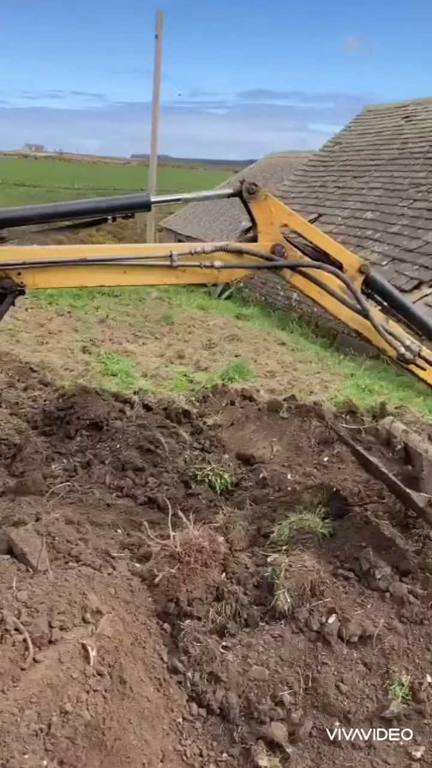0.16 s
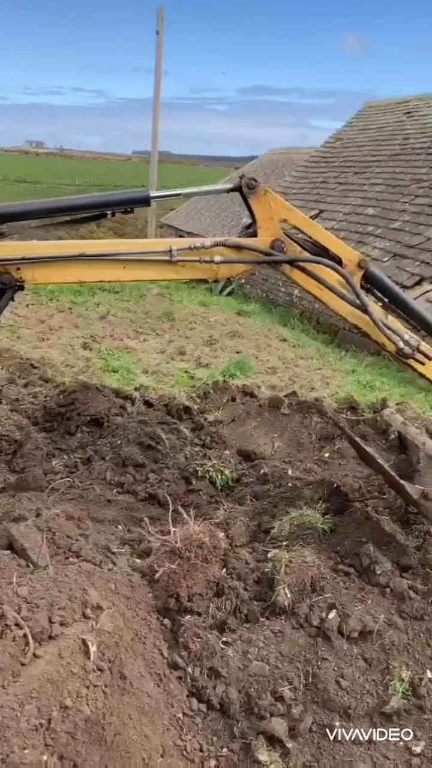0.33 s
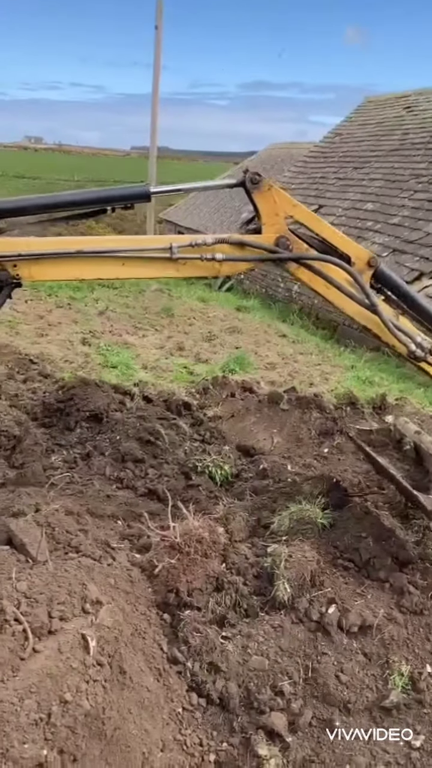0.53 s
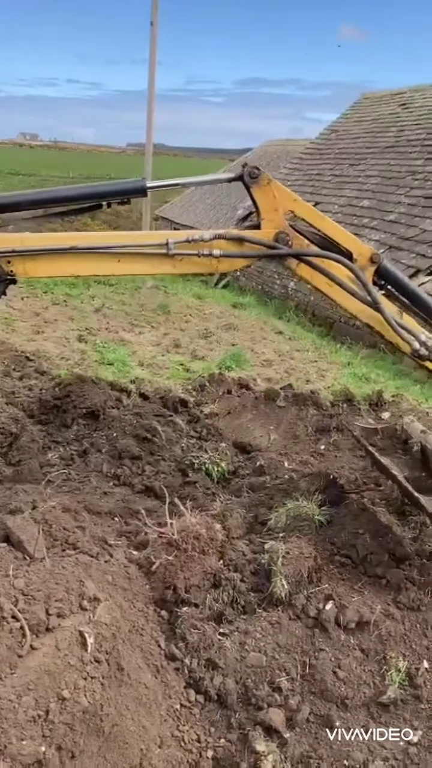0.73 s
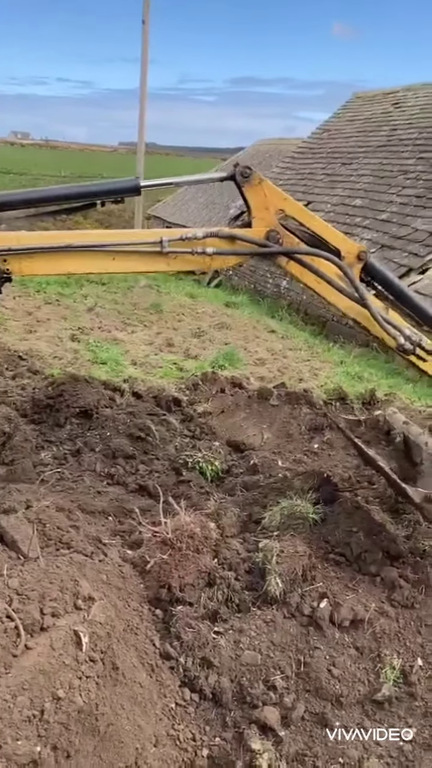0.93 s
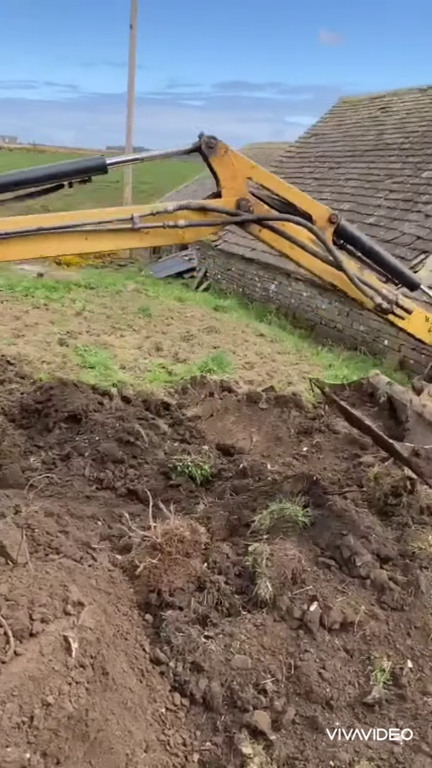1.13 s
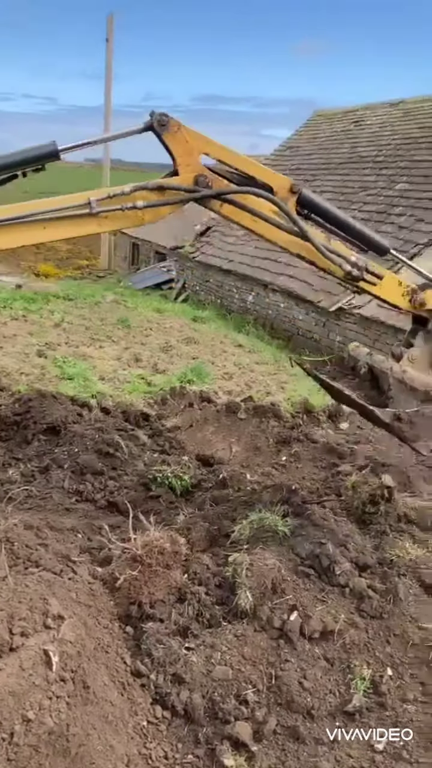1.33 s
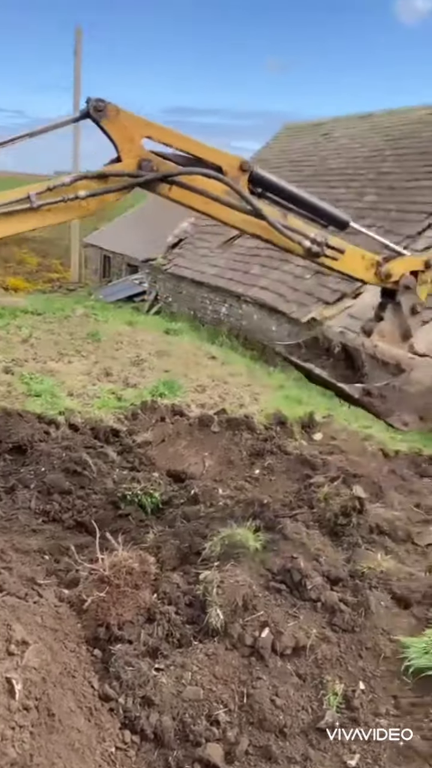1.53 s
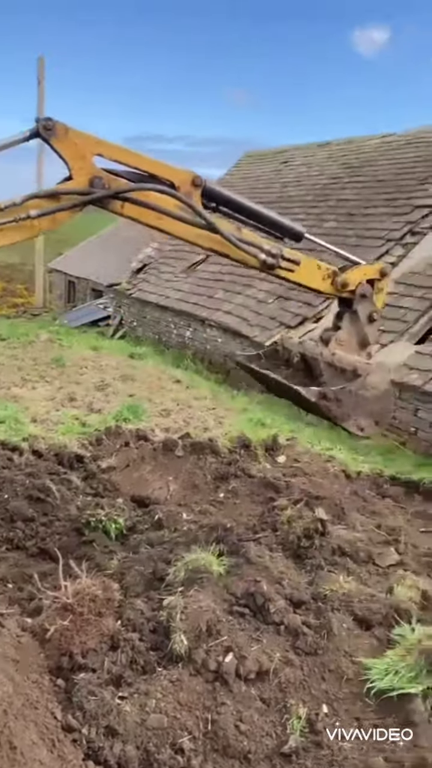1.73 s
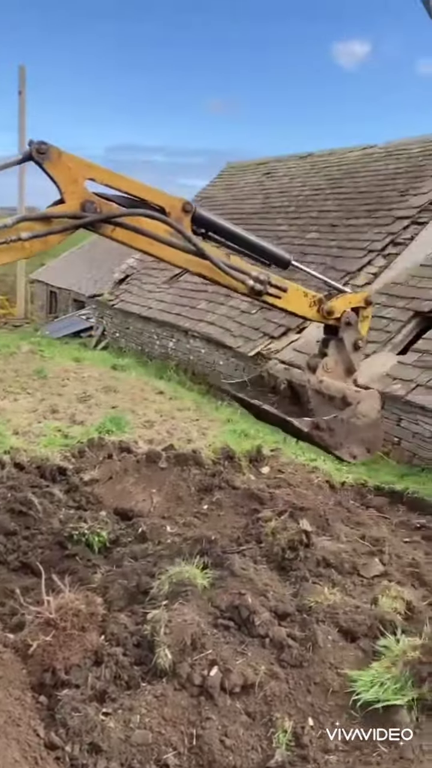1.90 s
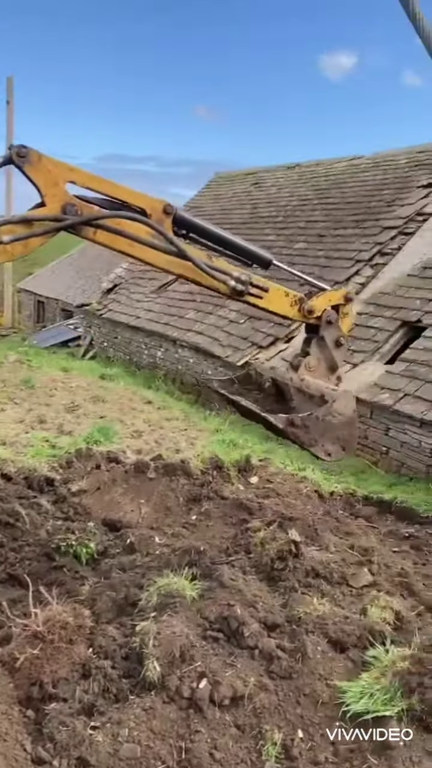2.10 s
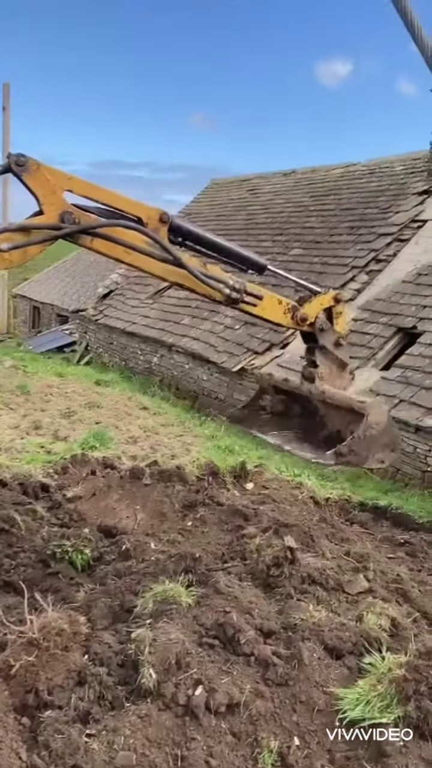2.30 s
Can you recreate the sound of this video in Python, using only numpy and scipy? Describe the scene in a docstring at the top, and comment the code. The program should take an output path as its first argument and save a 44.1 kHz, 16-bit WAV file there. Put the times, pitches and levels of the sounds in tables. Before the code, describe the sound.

A small digger's diesel engine thumps and sags under load while its steel bucket clanks outdoors

```python
"""A small three-cylinder diesel digger works in a field, its exhaust thumping and its block knocking at
each firing, while noise of fan and engine hisses on and wind buffets the two microphone ports of a phone.
Stones rustle, then the bucket's steel clanks as filtered noise bursts; the engine's speed sags when the arm
takes load, and a wavering hum swells. The engine recovers and sags again as the wind fades for a while.
Near the end the clanks crowd together, with decaying tones for the booms of the bucket's body."""
import sys
import numpy as np
from scipy import signal
from scipy.fft import rfft, irfft, next_fast_len
from scipy.io import wavfile
from scipy.ndimage import map_coordinates

SR = 44100
rng = np.random.default_rng(int(sys.argv[2]) if len(sys.argv) > 2 else 0)


def pcm_store(signal):
    """Save signal as 16-bit PCM."""
    levels = np.round(np.clip(np.atleast_2d(signal), -1, 1) * 32767)
    wavfile.write(sys.argv[1], SR, levels.astype(np.int16).T)


def amplitude_ratio(level_db):
    """Convert a level in decibels to the matching linear amplitude (field) ratio."""
    exponent = np.asarray(level_db, float) / 20
    return 10 ** exponent


N = 108265  # samples


def unit(x):
    """Scaled to rms 1."""
    return x / np.sqrt(np.mean(x ** 2) + 1e-20)


def along(points, hz):
    """(Hz, value) points read on a log frequency axis."""
    f, v = np.transpose(points)
    return np.interp(np.log(hz + 1), np.log(f + 1), v)


def curve(rows):
    """(seconds, value) rows joined by straight lines, one value per sample."""
    s, v = np.transpose(rows)
    return np.interp(np.arange(N) / SR, s, v)


def wobble(rate):
    """A smooth random curve, with rate knots a second."""
    knots = rng.standard_normal(int(N * rate / SR) + 4)
    return map_coordinates(knots, [np.arange(N) * rate / SR])


def filtered(x, response):
    """x shaped by a complex response of frequency."""
    m = next_fast_len(N + SR // 2)
    return irfft(rfft(x, m) * response(np.fft.rfftfreq(m, 1 / SR)), m)[..., :N]


def coloured_noise(colour):
    """Noise of rms 1 with the given (Hz, dB per Hz) spectrum."""
    return unit(filtered(rng.standard_normal(N), lambda f: amplitude_ratio(along(colour, f))))


def resonances(peaks):
    """Causal response of (Hz, width in Hz, dB) resonances, added with alternating signs."""
    def response(f):
        total = 0
        for k, (centre, width, db) in enumerate(peaks):
            damping = 1j * f * width
            total = total + (-1) ** k * amplitude_ratio(db) * damping / (centre * centre - f * f + damping)
        return total
    return response


def pulses(times, gains):
    """One impulse at each time."""
    at = np.round(times * SR).astype(int)
    inside = (at >= 0) & (at < N)
    return np.bincount(at[inside], gains[inside], N)


# Engine speed. Each row: time in seconds, firings per second.
SPEED = [(0.0, 30.27), (0.25, 28.89), (0.32, 28.6), (0.43, 24.5), (0.58, 25), (0.72, 31.04), (0.9, 31.19),
         (1.03, 27.79), (1.2, 23.95), (1.4, 26.08), (1.75, 25.26), (1.95, 30.73), (2.15, 30.42),
         (2.3, 24.9), (2.45, 24.62)]
FIRST_FIRING = 0.12  # firings until the first knock


def shaft():
    """The running count of firings sums the speed; each whole number is one firing."""
    count = np.cumsum(curve(SPEED)) / SR - FIRST_FIRING
    number = np.arange(-2, int(count[-1]) + 1)
    times = np.interp(number, count, np.arange(N) / SR, left=-1)
    return count, number, times


# Level of the exhaust thumps. Each row: time in seconds, level in dB.
EXHAUST = [(0.0, -31), (0.24, -31), (0.27, -27), (0.62, -28), (0.99, -33.5), (1.11, -43), (1.14, -28.5),
           (1.25, -33.5), (1.3, -29), (1.86, -28.5), (1.9, -29.5), (2.15, -28.5), (2.22, -35.5),
           (2.33, -27.5), (2.35, -29), (2.45, -31)]
# Resonances of exhaust pipe and silencer. Each row: pitch in Hz, width in Hz, relative level in dB.
PIPE = [(52.4, 8.9, -1), (81.1, 11.4, 2.5), (100.1, 21.8, 8), (162.8, 27.4, -2.5)]
# Turbulent rumble in the exhaust. Each row: frequency in Hz, relative level in dB per Hz.
RUMBLE_COLOUR = [(18, -32), (40, 1), (100, -14), (175, 11.5), (205, 11.5), (235, -24), (400, -6.5),
                 (600, -28), (22000, -120)]
RUMBLE_DB = -12  # against the thumps
PIPE_DELAY_S = 0.00327
FIRING_SCATTER_DB, FIRING_JITTER_S = 1.5, 0.0004


def exhaust(times):
    """Each firing sends a pulse of slightly random size and time through the pipe; the gas rumbles."""
    def pipe(f):
        rung = -sum(resonances([peak])(f) for peak in PIPE)
        lowpass = 1 / (1 + 1j * f / 150) ** 2
        highpass = 1j * f / (1j * f + 45)
        return rung * lowpass * highpass

    late = PIPE_DELAY_S + FIRING_JITTER_S * rng.standard_normal(len(times))
    sizes = amplitude_ratio(FIRING_SCATTER_DB * rng.standard_normal(len(times)))
    thumps = unit(filtered(pulses(times + late, sizes), pipe))
    return amplitude_ratio(curve(EXHAUST)) * (thumps + amplitude_ratio(RUMBLE_DB) * coloured_noise(RUMBLE_COLOUR))


# Relative strength of the knock, in dB, one number for each of the three cylinders.
CYLINDER_DB = [-34, -35, -30]
# Engine block, rung by the knock. Each row: pitch in Hz, width in Hz, relative level in dB.
BLOCK = [(1400, 900, -9), (2980, 220, 6), (4200, 500, -7), (7000, 830, -20)]
KNOCK_SCATTER_DB, KNOCK_T60_S = 2.5, 0.036


def knock(number, times):
    """Each firing is a short noise burst that rings the block, its strength set by its cylinder."""
    scatter = KNOCK_SCATTER_DB * rng.standard_normal(len(number))
    sizes = amplitude_ratio(np.take(CYLINDER_DB, number % 3) + scatter)
    t = np.arange(SR // 10) / SR
    shape = amplitude_ratio(-60 * t / KNOCK_T60_S) * (1 - np.exp(-t / 0.0005))
    burst = signal.fftconvolve(pulses(times, sizes), shape)[:N]
    return 3 * filtered(burst * rng.standard_normal(N), resonances(BLOCK))


# Level of engine and fan noise. Each row: time in seconds, level in dB before throb and drift.
ROAR = [(0, -42), (.5, -40), (.9, -43), (1.05, -41.5), (1.5, -42.5), (1.9, -43.5), (2.2, -38), (2.45, -45)]
# Its spectrum. Each row: frequency in Hz, relative level in dB per Hz.
ROAR_COLOUR = [(30, -58), (300, -13), (500, -9), (700, -8), (1000, -13), (1600, -17), (2500, -16),
               (3200, -25), (4500, -28), (5700, -32), (6600, -27), (8000, -31), (10000, -34), (11300, -45),
               (22000, -120)]
ROAR_THROB = 0.4  # depth of the swell at each firing


def roar(count):
    """Steady noise of engine and fan, swelling with each firing and drifting a little."""
    throb = 1 + ROAR_THROB * np.cos(2 * np.pi * count)
    drift_db = 0.49 * wobble(5.43)
    return coloured_noise(ROAR_COLOUR) * throb * amplitude_ratio(curve(ROAR) + drift_db)


# Wind on the ports. Each row: time in seconds, level in dB before the random gusts.
WIND = [(0, -31.5), (.55, -39), (.82, -27.5), (1.08, -35), (1.35, -30), (1.7, -57.5), (2.3, -31.5)]
# Its spectrum. Each row: frequency in Hz, relative level in dB per Hz.
WIND_COLOUR = [(18, -36), (45, 2), (100, 4.5), (200, -9), (400, -24), (900, -24.5), (3000, -90),
               (22000, -120)]
WIND_ALIKE = 0.22  # likeness (correlation) of the two ports


def wind():
    """Lumpy low buffeting, mostly different at each port: two noises mixed by an angle."""
    a, b = filtered(rng.standard_normal((2, N)), lambda f: amplitude_ratio(along(WIND_COLOUR, f)))
    turn = np.arccos(np.clip(WIND_ALIKE, -1, 1)) / 2
    left = np.cos(turn) * a + np.sin(turn) * b
    right = np.cos(turn) * a - np.sin(turn) * b
    gusts_db = 3 * np.array([wobble(20), wobble(12)])
    return amplitude_ratio(curve(WIND) + gusts_db) * unit(np.array([left, right]))


# Stones and soil tumbling in the bucket. Each row: time in seconds, level in dB.
DEBRIS = [(0, -48), (.25, -56), (.75, -43), (.9, -87), (2, -67), (2.06, -62), (2.3, -41), (2.45, -45)]
# Their spectrum. Each row: frequency in Hz, relative level in dB per Hz.
DEBRIS_COLOUR = [(100, -61), (250, 0.5), (700, 6), (1500, -3), (2600, -2.5), (5000, -19), (22000, -87)]
DEBRIS_PER_S, DEBRIS_SCATTER_DB, DEBRIS_T60_S = 250, 8.3, 0.068


def debris():
    """Stones and soil as noise grains at random moments, of very unequal size."""
    grains = (rng.random(N) < DEBRIS_PER_S / SR) * amplitude_ratio(DEBRIS_SCATTER_DB * rng.standard_normal(N))
    decay = amplitude_ratio(-60 * np.arange(SR // 20) / SR / DEBRIS_T60_S)
    bursts = signal.fftconvolve(grains, decay)[:N] * rng.standard_normal(N)
    return amplitude_ratio(curve(DEBRIS)) * unit(filtered(bursts, lambda f: amplitude_ratio(along(DEBRIS_COLOUR, f))))


# Bucket clanks. Each row: start in seconds, peak in dB, centre of the sound in Hz,
# relative treble level in dB, time of the blow to fall by 60 dB in seconds.
CLANKS = [(0.274, -18.5, 1120, -13.5, 0.061), (.333, -24, 600, -28, 0.071), (.393, -21.5, 746, -55, 0.023),
          (0.557, -25, 960, -35, 0.04), (0.646, -20, 2000, -30, 0.09), (1.031, -21, 680, -14, 0.05),
          (2.039, -25, 2000, -26, 0.03), (0.702, -16.5, 815, -50, 0.054), (2.048, -15, 1250, -30, 0.063),
          (2.12, -26.5, 1065, -44, 0.051), (2.156, -18.5, 1460, -15.5, 0.048),
          (2.177, -23, 740, -30.5, 0.032), (2.236, -8.5, 1154, -22, 0.041), (2.29, -25, 1570, -39.5, 0.044),
          (2.311, -23.5, 1560, -24, 0.022), (2.334, -27, 705, -50, 0.1), (2.399, -22, 1930, -47.5, 0.074)]
# Bucket steel, damped by soil. Each row: pitch in Hz, width in Hz, relative level in dB.
STEEL = [(555, 70, 4), (665, 70, 8), (760, 90, 1), (1070, 90, 0), (1250, 55, 3), (1395, 50, 6),
         (1910, 70, -2), (2400, 200, -4), (3000, 160, -9), (4000, 140, -8)]
MODE_SCATTER_DB = 3  # each blow rings the steel's modes in another mix
SPREAD_OCTAVES, TREBLE_HZ, BLOW_RISE_S = 0.7, 6000, 0.0015
SCRAPE_DB, RATTLE_DB = -7, 3  # toneless part under the resonances; unevenness of the blow


def clanks():
    """Each blow is a short uneven scrape of noise that rings the steel's resonances."""
    out, t = np.zeros(N + SR), np.arange(SR // 3) / SR
    f = np.fft.rfftfreq(len(t), 1 / SR) + 1
    for start, peak_db, centre_hz, treble_db, t60 in CLANKS:
        modes = [(c, w, db + rng.normal(0, MODE_SCATTER_DB)) for c, w, db in STEEL]
        near = np.exp(-.5 * (np.log2(f / centre_hz) / SPREAD_OCTAVES) ** 2)
        treble = amplitude_ratio(treble_db) * np.exp(-.5 * np.log2(f / TREBLE_HZ) ** 2)
        colour = amplitude_ratio(SCRAPE_DB) * near + treble + resonances(modes)(f) * near
        # the strength jumps every 100 samples
        steps = np.repeat(rng.standard_normal(len(t) // 100 + 1), 100)[:len(t)]
        shape = amplitude_ratio(-60 * t / t60) * (1 - np.exp(-t / BLOW_RISE_S))
        push = rng.standard_normal(len(t)) * amplitude_ratio(RATTLE_DB * steps) * shape
        blow = irfft(rfft(push) * colour, len(t))[:len(t) - 200]
        out[round(start * SR):][:len(blow)] += amplitude_ratio(peak_db) * blow / np.abs(blow).max()
    return out[:N]


# A hum that swells under load. Each row: time in seconds, level in dB before the random wavering.
PUMP = [(0, -75), (.35, -51.5), (.5, -27.5), (.6, -54.5), (1.05, -99), (1.12, -39.5), (1.27, -45.5),
        (1.4, -46), (1.75, -47.5), (2.45, -43)]
PUMP_HZ = 317.8


def pump():
    """A hum, perhaps the hydraulic pump: a sine with wavering level and phase."""
    level = amplitude_ratio(curve(PUMP) + 2.1 * wobble(16.34))
    return level * np.sin(2 * np.pi * PUMP_HZ * np.arange(N) / SR + 1.76 * wobble(24))


# Booms of the bucket's body. Each row: start in seconds, level of the tone in dB before
# its rise and decay, pitch in Hz.
BOOMS = [(1.834, -29.5, 273), (2.053, -18, 200.5), (2.091, -18, 256.7), (2.139, -22.5, 262),
         (2.189, -21.5, 210.5), (2.244, -19, 280), (2.304, -20, 243), (2.328, -25.5, 282),
         (2.399, -17.5, 263)]
BOOM_T60_S, BOOM_RISE_S = 0.16, 0.005
THUD_DB, THUD_HZ = -5, 240  # toneless soil thud under each boom


def booms():
    """The bucket's body rings as a decaying sine, with a band of low noise for the soil."""
    out, t = np.zeros(N + SR), np.arange(SR // 3) / SR
    f = np.fft.rfftfreq(len(t), 1 / SR) + 1
    band = np.exp(-2 * np.log2(f / THUD_HZ) ** 2)
    for start, level_db, pitch_hz in BOOMS:
        thud = unit(irfft(rfft(rng.standard_normal(len(t))) * band, len(t)))
        body = np.sin(2 * np.pi * pitch_hz * t) + amplitude_ratio(THUD_DB) * thud
        shape = amplitude_ratio(level_db - 60 * t / BOOM_T60_S) * (1 - np.exp(-t / BOOM_RISE_S))
        out[round(start * SR):][:len(t)] += shape * body
    return out[:N]


# Yard echo from the barn. Each row: delay in seconds, level in dB.
BARN = [(0.012, -14), (0.021, -15.5)]
# Diffuse sound, unrelated at the ports. Each row: frequency in Hz, dB per Hz against the direct sound.
DIFFUSE = [(60, -16), (300, -11.5), (1500, -6), (2600, -13.5), (4200, -2), (5500, -15.5), (8000, -10.5)]
TAIL_T60_S = 0.094


def ports(x, lead):
    """Barn echoes join the sound; the left port leads in phase, and a short diffuse tail differs per port."""
    x = filtered(x, lambda f: 1 + sum(amplitude_ratio(db) * np.exp(-2j * np.pi * f * s) for s, db in BARN))
    sides = np.array([[1], [-1]])  # half the lead on each side
    direct = filtered(x, lambda f: np.exp(.5j * sides * along(lead, f)))
    t = np.arange(SR // 8) / SR
    tail = rng.standard_normal((2, len(t))) * amplitude_ratio(-60 * t / TAIL_T60_S)
    scattered = signal.fftconvolve(x[None], tail / np.linalg.norm(tail[0]), axes=1)[:, :N]
    return direct + filtered(scattered, lambda f: amplitude_ratio(along(DIFFUSE, f)))


# Phase by which the left port leads for the engine. Each row: frequency in Hz, lead in radians.
ENGINE_LEAD = [(0, 0), (1500, .3), (2000, 1), (2700, 2.95), (4300, 2.9), (5000, 3.1), (6200, 3.2),
               (6800, 4.4), (7700, 6.2), (9900, 6.4), (10500, 9.3), (12000, 9.5)]
# The same for the bucket, in another direction. Each row: frequency in Hz, lead in radians.
BUCKET_LEAD = [(0, 0), (2100, .1), (2800, 2.3), (4600, 2), (5300, 3.1), (6400, 3.4), (7700, 6.2),
               (9900, 6.4), (10500, 9.3)]


def scene():
    """Engine and bucket come through the air, the wind blows straight on the ports."""
    count, number, times = shaft()
    engine = exhaust(times) + knock(number, times) + roar(count) + pump()
    bucket = debris() + clanks() + booms()
    return ports(engine, ENGINE_LEAD) + ports(bucket, BUCKET_LEAD) + wind()


def roll_off(x):
    """The treble ends steeply here."""
    return signal.sosfilt(signal.butter(12, 11670, fs=SR, output="sos"), x)


MIC_TOP_HZ = 10160


def record(dry):
    """The microphones roll off steeply at the top."""
    mix = filtered(dry, lambda f: 1 / np.sqrt(1 + (f / MIC_TOP_HZ) ** 16))
    return roll_off(mix)


dry = scene()
out = record(dry)
pcm_store(out)
```